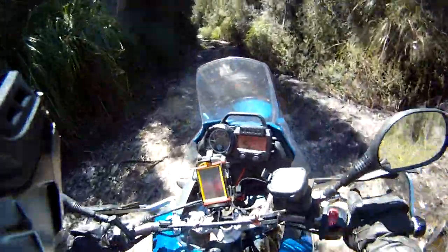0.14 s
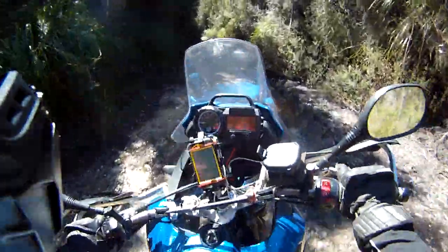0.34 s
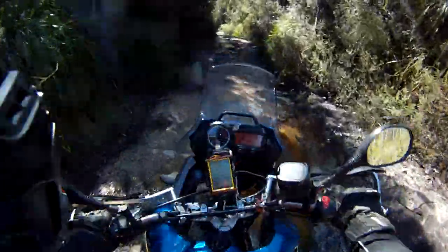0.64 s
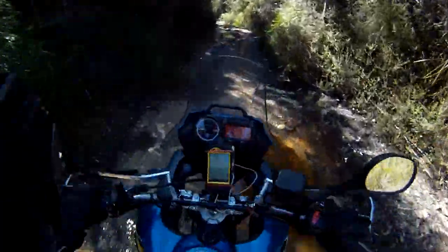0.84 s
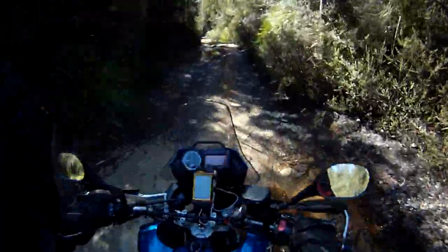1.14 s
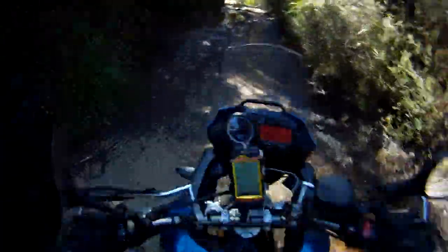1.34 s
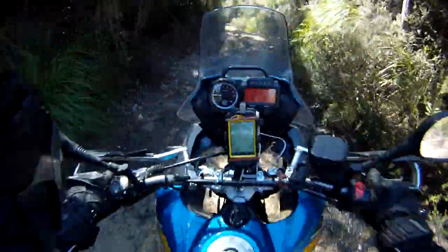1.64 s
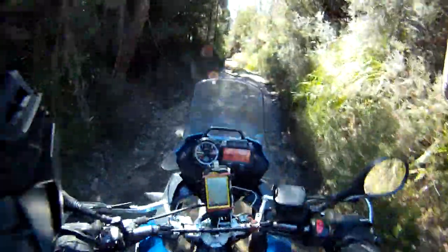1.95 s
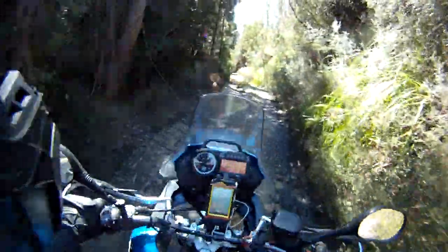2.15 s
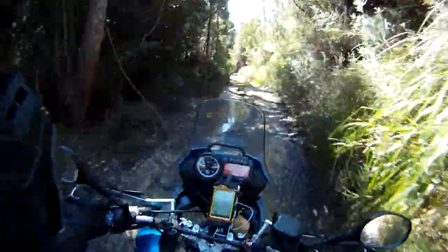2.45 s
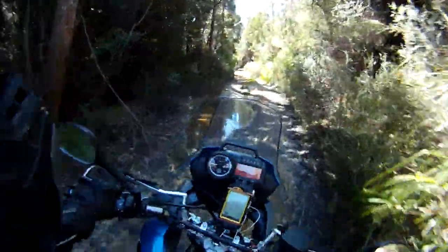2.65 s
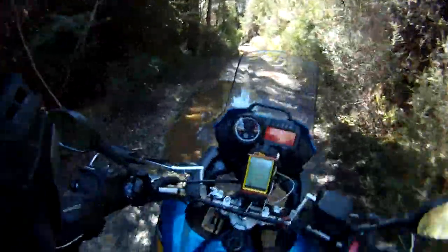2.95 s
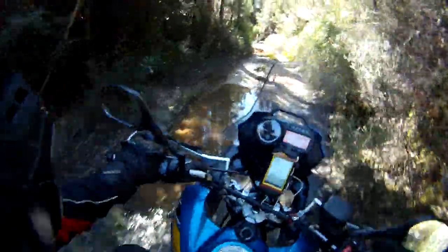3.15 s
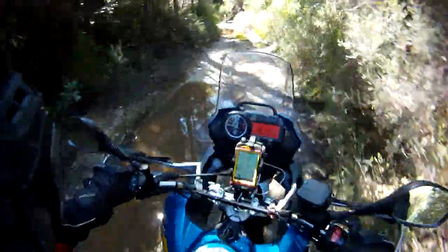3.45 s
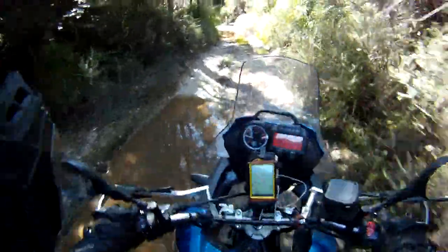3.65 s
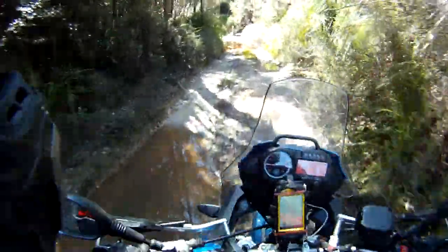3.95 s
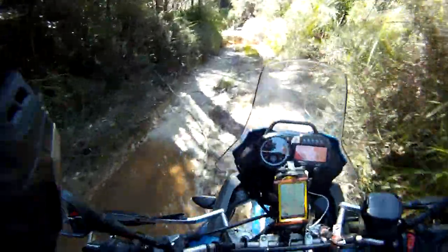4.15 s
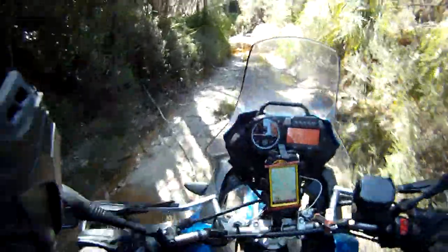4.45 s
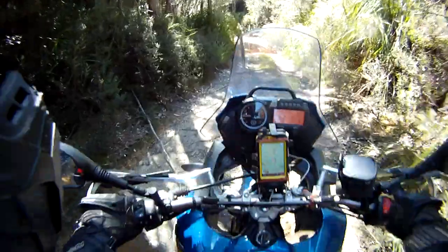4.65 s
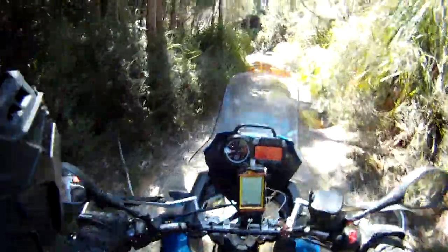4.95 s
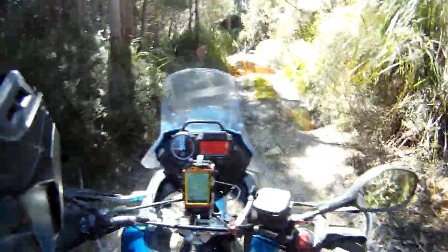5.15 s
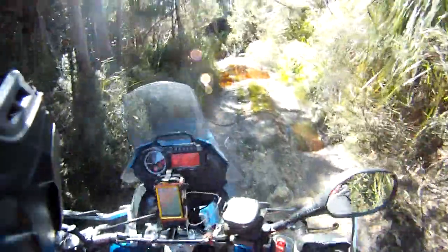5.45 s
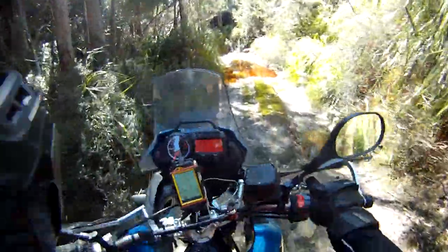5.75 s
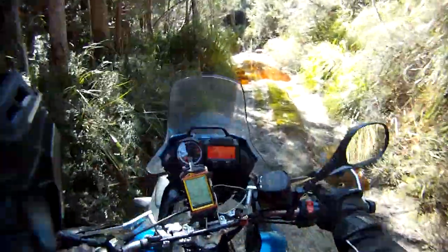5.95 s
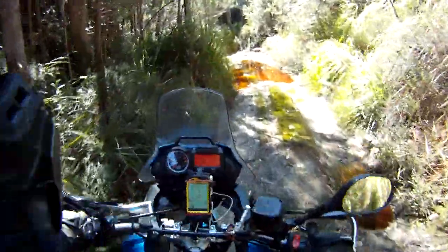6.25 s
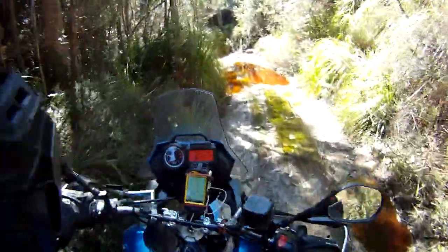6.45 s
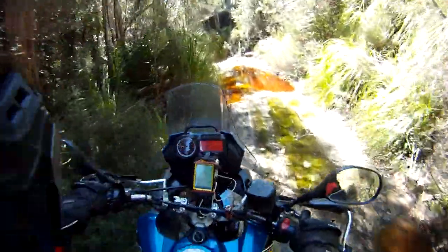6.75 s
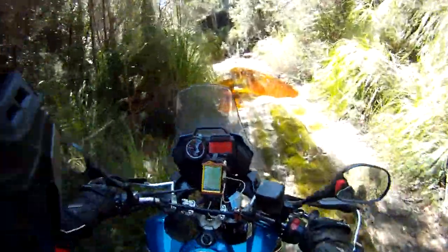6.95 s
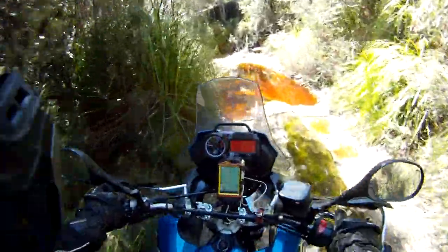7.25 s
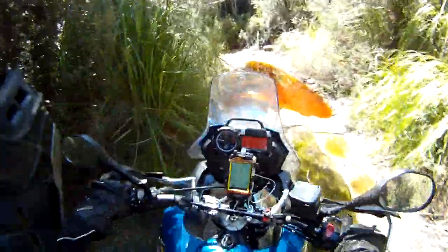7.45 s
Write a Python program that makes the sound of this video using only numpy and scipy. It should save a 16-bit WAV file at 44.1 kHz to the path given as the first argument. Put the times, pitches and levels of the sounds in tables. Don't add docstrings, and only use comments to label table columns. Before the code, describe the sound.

Outdoors on a rough trail, a slow thudding engine rattles continuously, each firing distinct. Gravel crunches in small clumps, with sharp stone clicks and hollow plastic knocks around two deep bumps. Revs swell briefly early on, settle into a steady plod, surge strongly near six seconds and sink to a slow chug. The enclosed microphone muffles the exhaust, emphasises nasal midrange clatter and adds gritty, coarse treble.

```python
import sys
import numpy as np
from scipy import signal
from scipy.fft import rfft, irfft
from scipy.io import wavfile
from scipy.ndimage import uniform_filter1d

SR = 44100
rng = np.random.default_rng(int(sys.argv[2]) if len(sys.argv) > 2 else 0)


def pcm_store(signal):
    levels = np.round(np.clip(np.atleast_2d(signal), -1, 1) * 32767)
    wavfile.write(sys.argv[1], SR, levels.astype(np.int16).T)


def voltage_ratio(level):
    return 10 ** (np.asarray(level, float) / 20)


N = 334719


# time in s, exhaust pop in dB, pipe pitch as a factor (hot gas raises it).
THROTTLE = [(0, -42.5, 1.05), (.3, -39.5, 1.11), (.6, -42, 1.105), (1, -44, 0.99), (1.3, -41.5, 0.97),
            (1.69, -46, 1.11), (1.88, -35.5, 1.09), (2.19, -42, 0.98), (2.4, -40.5, 1.01), (3.2, -40, 1.13),
            (3.37, -47, 1.01), (4.4, -42.5, 1.085), (5.1, -46.5, 1.01), (5.57, -47, .99), (5.95, -35, 1.2),
            (6.5, -41.5, 1.074), (6.95, -39.5, 1.124), (7.59, -45, 1.09)]
# frequency in Hz, level in dB, t60 in s.
BLOW = [(220, -4, 0.055)]
# frequency in Hz, level in dB, t60 in s.
PIPE = [(186.6, -2.5, .12), (208.8, -4, 0.12)]
# frequency in Hz, level in dB, t60 in s.
SILENCER = [(249, -6.5, 0.089), (275.3, -10.5, 0.15), (343, -11, 0.056)]


def exhaust(cycles):
    lead = round(.0049 * SR)
    throttle_db, pitch = column(THROTTLE, index=1), column(THROTTLE, index=2)
    pops = once_a_cycle(cycles, spread_db=.5) * voltage_ratio(throttle_db + 2.5)
    pipe_db = 1.1 - 48 * (pitch - 1.03)
    silencer_db = 2.7 - 0.6 * (throttle_db + 42)
    blow_db = 0.8 * np.minimum(throttle_db + 40, 0)
    out = np.zeros(N + lead)
    for at in np.flatnonzero(pops):
        parts = (BLOW, blow_db[at]), (PIPE, pipe_db[at]), (SILENCER, silencer_db[at])
        modes = [(hz * pitch[at], db + extra_db, t60)
                 for part, extra_db in parts for hz, db, t60 in part]
        add(out, at / SR, -pops[at] * ring(modes, rise=0.0021, size=4500))
    muffle = signal.butter(2, (125, 310), "bandpass", fs=SR, output="sos")
    return signal.sosfiltfilt(muffle, out)[lead:]


# share of the cycle, level in dB.
STROKES = [(0, -1), (.1, -1), (.2, 1.5), (.33, 0), (.45, -4), (.6, -6.5), (.69, -6.5), (.71, 2), (.85, 0),
           (1, -1)]
# frequency in Hz, width in Hz, level in dB.
CASE = [(842, 450, -10), (1157, 66, 2.5), (1505, 180, 0), (1786, 210, 7), (2066, 360, -1.5),
        (2381, 58, -2.5), (2726, 130, 2.5), (3430, 180, -17.5), (4820, 1100, -1)]
# frequency in Hz, level in dB per Hz.
GRIT = [(800, -11.5), (1600, 1.5), (2800, 4), (3700, -1), (4300, -15.5), (4900, 4.5), (5600, -6),
        (7000, -9)]


def clatter(cycles):
    share, stroke_db = np.transpose(STROKES)
    extra_speed = speed() - 15
    drive = evened(grains(7000, 1.0)) * voltage_ratio(np.interp(cycles % 1, share, stroke_db))
    modes = [(hz, db + 10 * np.log10(width), 2.24 / width) for hz, width, db in CASE]
    low = signal.oaconvolve(drive, ring(modes[:5], rise=0.00012))[:N]
    high = signal.oaconvolve(drive, ring(modes[5:], rise=0.00012))[:N]
    rattle = evened(low + voltage_ratio(0.34 * extra_speed) * high)
    hiss = voltage_ratio(-14) * coloured(drive, GRIT)
    load_db = 0.11 * (column(THROTTLE, index=1) + 41)
    revs_db = 0.3642 * extra_speed
    jolts_db = 0.68 * (np.maximum(column(TRAIL, index=1), -62) + 60)
    return voltage_ratio(-49.5 + load_db + revs_db + jolts_db) * (rattle + hiss)


def valve(cycles):
    lead_cycles = .285 + .008 * (speed() - 15)
    ticks = once_a_cycle(cycles + lead_cycles, spread_db=1) * ticking()
    bounce = voltage_ratio(-60 * np.arange(2500) / SR / 0.085)
    chatter = signal.oaconvolve(ticks, bounce)[:N] * grains(4000, .4)
    modes = [(1814, 0.5, 0.054), (1773, -6, 0.03), (1420, -3, 0.013),
             (1120, -11, 0.025), (2590, -5.5, 0.022), (2630, -20, 0.019)]
    return signal.oaconvolve(0.69 * ticks + 0.11 * chatter, ring(modes, rise=0.00052))[:N]


# start in s, length in s, level in dB.
TICKING = [(0, .66, -38), (.66, .4, -44.5), (1.8, .3, -49), (2.3, .46, -38.5), (2.98, .2, -43),
           (3.98, .14, -41), (4.33, .12, -39), (4.66, .12, -48), (5.35, .3, -59), (5.66, .14, -45),
           (6.0, .14, -42), (6.38, .28, -39), (6.66, .33, -45)]


def ticking():
    out = np.full(N, voltage_ratio(-59))
    for s, length_s, db in TICKING:
        add(out, s, np.full(round(length_s * SR), voltage_ratio(db)))
    return out


ORDER_DB = (2, -3, -2, 2.5, -3.5, -7)
IN_STEP_HZ = (32.5, 55, 54, 100, 89, 80)
LAG_PER_HZ = (.22, .18, .17, .03, .05, .05)
# frequency in Hz, level in dB.
FRAME = [(22, -24), (33, -9), (41, -5), (48, -3), (58, -14), (70, -11), (85, -9), (96, -18), (120, -25),
         (180, -22)]


def engine_orders(cycles):
    rate = speed()
    idling_db = 2.4 * np.minimum(rate - 16.5, 0)
    out = np.zeros(N)
    for k, (db, in_step_hz, lag) in enumerate(zip(ORDER_DB, IN_STEP_HZ, LAG_PER_HZ), 2):
        level_db = db + read(FRAME, k * rate) + idling_db * (k < 4)
        phase = 2 * np.pi * k * cycles - lag * (k * rate - in_step_hz)
        out += voltage_ratio(level_db) * np.cos(phase)
    return voltage_ratio(column(THROTTLE, index=1)) * out


# frequency in Hz, level in dB per Hz.
RUMBLE = [(60, -11), (115, 0.5), (150, 0.5), (200, 2), (290, -1), (360, -8.5), (480, -3.5), (650, -25),
          (1000, -27), (1500, -58)]


def rumble(cycles):
    throttle_db = column(THROTTLE, index=1)
    rush = 0.7 + 1.1 * np.exp(-((cycles + .1) % 1) / 0.35)
    level_db = throttle_db - 21.5 - 0.5 * (throttle_db + 45)
    return voltage_ratio(level_db) * rush * coloured(grains(3000, 2.0), RUMBLE)


# crest in s, level in dB, frequency in Hz, fading time in s.
BUMPS = [(0.128, -54, 47, 0.022), (0.285, -43, 52.4, 0.02), (0.405, -41, 47.7, 0.038),
         (0.608, -30.5, 41, 0.046), (1.214, -32, 31.6, 0.033), (1.306, -28, 38.2, 0.012),
         (1.373, -37, 48, 0.026), (1.489, -35, 35.5, 0.026), (1.588, -18.5, 32.4, 0.011),
         (1.659, -33.5, 43.7, 0.028), (1.729, -27.5, 35, 0.014), (1.878, -28.5, 37, 0.03),
         (2.312, -40, 40.7, 0.032), (2.543, -55, 50, 0.046), (2.656, -48, 53, 0.067),
         (3.078, -44, 40.5, 0.03), (3.192, -38, 34.5, 0.033), (3.259, -33.5, 41.8, 0.026),
         (3.415, -18.5, 39.7, 0.025), (3.488, -33.5, 41.4, 0.017), (3.58, -33, 34.2, 0.019),
         (3.767, -38.5, 41, 0.064), (4.461, -39, 39, 0.03), (4.798, -45, 39, 0.034),
         (5.043, -47, 34, 0.029), (5.271, -30.5, 41, 0.012), (5.332, -39, 37.5, 0.015),
         (7.55, -34, 42.8, 0.022)]


def mount():
    lumps = coloured(rng.standard_normal(N), [(6, -20), (16, -8), (28, -11.5), (41, 3), (55, -14.5),
                                              (85, -16.5), (125, -20), (170, -42.5)])
    heaps_db = 4.66 * coloured(rng.standard_normal(N), [(1, 4.0), (8, 11), (20, -44.5)])
    out = trembling() * lumps * voltage_ratio(heaps_db)
    t = np.arange(-SR // 10, SR // 4) / SR
    for s, db, hz, fade_s in BUMPS:
        rise = np.exp(-(np.minimum(t, 0) / 0.029) ** 2)
        fall = np.cosh(np.maximum(t, 0) / fade_s)
        add(out, s + t[0], voltage_ratio(db) * rise / fall * np.cos(2 * np.pi * hz * t))
    return out


def trembling():
    t = np.arange(N) / SR
    steady = voltage_ratio(-54 + 0.43 * (column(THROTTLE, index=1) + 47))
    around = sum(voltage_ratio(db - 22) ** 2 * np.exp(-((t - s) / 0.13) ** 2) for s, db, _, _ in BUMPS)
    return np.sqrt(steady ** 2 + around)


# time in s, level in dB, brightness in dB.
KNOCKS = [
    (1.147, -36.5, 6),
    (1.244, -42, -5),
    (1.712, -41.5, -3),
    (1.853, -44.5, -9),
    (2.807, -39, -3),
    (2.9647, -35, 9.5),
    (3.245, -46, 9.5),
    (3.512, -43.5, 10),
    (4.058, -43.5, 13),
    (4.353, -37.5, 5),
]
# frequency in Hz, level in dB, t60 in s.
KNOCK = [(805, 3, .075), (520, -8, .03), (680, -9, .03), (1030, -6, .025), (1160, -3, .04),
         (1464, -0.5, .02), (1670, -5, .01), (127, -2, .085)]


def knocks():
    out = np.zeros(N)
    buzz_hz_db = [(250, -12), (600, -2), (1500, 0), (2500, -12), (4000, -40)]
    for s, db, bright_db in KNOCKS:
        modes = [(hz, level + (bright_db if hz > 1200 else 0), t60) for hz, level, t60 in KNOCK]
        add(out, s, -voltage_ratio(db + 0.5) * ring(modes, rise=0.00047, size=6000))
        add(out, s, -voltage_ratio(db + 6) * ring([(1100, 0, .007)], rise=.0003))
        add(out, s + 0.00617, voltage_ratio(db - 10.5) * ring(modes, rise=0.0028))
        buzz = coloured(rng.standard_normal(3000), buzz_hz_db)
        add(out, s, voltage_ratio(db - 8 - 60 * np.arange(3000) / SR / 0.072) * buzz)
    return out


# time in s, level in dB, frequency in Hz.
STONES = [(0.483, -40, 3430), (0.9868, -36.5, 3470), (1.1029, -39, 4400), (1.1174, -43, 4800),
          (1.1244, -42, 4700), (1.1717, -28, 4710), (1.179, -42, 4580), (1.7953, -40, 3840),
          (1.8923, -37, 4800), (2.172, -36, 5040), (2.2567, -37, 3600), (2.895, -37.5, 4400),
          (3.149, -43, 4610), (3.3556, -35.5, 3680), (3.4017, -50, 4120), (3.411, -40.5, 4740),
          (3.4191, -34.5, 4740), (3.461, -43, 3600), (3.8244, -58, 4770), (3.87, -42, 4900),
          (3.8931, -39.5, 3580), (3.92, -51, 4900), (3.9539, -45, 3510), (4.095, -43, 3520),
          (4.2647, -51, 3630), (5.025, -42.5, 4520), (5.1796, -46, 4450), (5.3168, -42.5, 4500)]
# time in s, level in dB, frequency in Hz, t60 in s.
CRACKS = [(1.0465, -40, 1730, 0.22), (1.0934, -29, 2020, 0.024), (1.0974, -41, 2900, 0.03),
          (1.1094, -33.5, 1590, 0.045), (1.1717, -51, 1790, 0.024), (1.9091, -41, 1680, 0.065),
          (1.9754, -32, 1850, 0.019), (3.3548, -41, 1830, 0.033), (3.7833, -61, 1830, 0.025),
          (3.8252, -33.5, 1630, 0.03), (3.9913, -50, 1820, 0.02), (4.0078, -37, 1860, 0.019),
          (4.1859, -42, 2380, 0.03), (4.559, -41, 1480, 0.037), (4.7581, -49, 1420, 0.12),
          (5.9923, -44, 1720, 0.02), (6.1544, -42, 1480, 0.049)]


def stones():
    out = np.zeros(N)
    thrown = [(*stone, .013) for stone in STONES]
    for s, db, hz, t60 in thrown + CRACKS:
        modes = [(hz, 0, t60), (hz * 1.09, -4, t60 * 0.87), (hz * 0.92, -6, t60 * .5)]
        grit_db = -8 + .5 * hz / 1000 - 60 * np.arange(3000) / SR / t60
        grit = coloured(rng.standard_normal(3000), GRIT) * voltage_ratio(grit_db)
        add(out, s, voltage_ratio(db) * (ring(modes, rise=0.0003) + grit))
    return out


# time in s, level in dB.
TRAIL = [(0, -59), (.17, -61.5), (.51, -62), (.93, -70), (1.0, -55.5), (1.2, -56.5), (1.48, -51.5),
         (1.8, -55.5), (2.08, -52.5), (2.4, -60.5), (3.24, -60), (3.31, -66), (3.65, -63), (4.2, -62),
         (4.4, -64.5), (5.57, -68), (5.9, -58.5), (7.59, -71)]
# frequency in Hz, level in dB per Hz.
GRAVEL = [(400, -8.5), (900, -21.5), (1150, -0.5), (1500, -2), (2100, -1), (2750, -0.5), (3400, -7.5),
          (4300, -14.5), (4850, -11), (5600, -11.5), (7000, -54)]
# start in s, length in s, level in dB.
SCRAPES = [
    (3.698, .048, -43),
    (3.354, .02, -50),
    (3.89, .038, -48),
    (5.19, .03, -58),
    (4.09, .05, -55),
    (3.455, .015, -54),
    (3.945, .02, -54),
    (.98, .03, -58),
]


def tyres():
    smooth = uniform_filter1d(uniform_filter1d(rng.standard_normal(N), 500), 300)
    clumps = voltage_ratio(2.07 * evened(smooth))
    crunch = voltage_ratio(column(TRAIL, index=1) + 9.5) * clumps * coloured(grains(7000, 0.28), GRAVEL)
    scrape = np.zeros(N)
    for s, length_s, db in SCRAPES:
        add(scrape, s, voltage_ratio(db) * signal.windows.tukey(round(length_s * SR), .4))
    return crunch + scrape * coloured(grains(6000, 0.77), GRIT)


# time in s, firings per s.
SPEED = [(0.0, 12.432), (0.196, 14.593), (0.468, 15.243), (0.555, 12.474), (1.282, 13.357), (1.497, 23.657),
         (1.702, 14.046), (2.121, 13.991), (2.126, 13.548), (2.496, 17.141), (3.11, 17.579), (3.38, 13.011),
         (5.637, 13.357), (6.039, 25.667), (6.491, 17.88), (7.006, 15.207), (7.306, 12.736), (7.59, 10.993)]
# time in s, firings per s gained.
LURCHES = [(0.879, 1.45), (1.502, -2.29), (2.069, 2.05), (3.66, 0.59), (4.051, -0.95), (4.622, 4.4),
           (4.684, -4.59), (4.886, 1.04), (5.316, -1.77), (5.844, 1.77), (6.98, 0.86)]


def speed():
    t = np.arange(N) / SR
    lurches = sum(gain * np.exp(-((t - s) / .1126) ** 2) for s, gain in LURCHES)
    return column(SPEED, index=1) + lurches


def once_a_cycle(cycles, spread_db):
    whole = np.floor(cycles).astype(int)
    strength = voltage_ratio(spread_db * rng.standard_normal(400))
    return np.diff(whole, prepend=whole[0]) * strength[whole]


def grains(per_s, spread_db):
    size = voltage_ratio(spread_db * np.minimum(rng.exponential(1, N), 5)) * rng.standard_normal(N)
    return size * (rng.random(N) < per_s / SR)


def ring(modes, rise, size=3000):
    t = np.arange(size) / SR
    tones = sum(voltage_ratio(db - 60 * t / t60) * np.sin(2 * np.pi * hz * t) for hz, db, t60 in modes)
    return tones * (1 - np.exp(-t / rise))


def coloured(x, points):
    gain = voltage_ratio(read(points, np.fft.rfftfreq(len(x), 1 / SR)))
    return evened(irfft(rfft(x) * gain, len(x)))


def read(points, hz):
    known_hz, db = np.transpose(points)
    return np.interp(np.log(hz + 1), np.log(known_hz + 1), db)


def evened(x):
    return x / np.sqrt(np.mean(x ** 2) + 1e-20)


def column(table, index):
    rows = np.array(table)
    return np.interp(np.arange(N) / SR, rows[:, 0], rows[:, index])


def add(mix, s, sound):
    part = mix[round(s * SR):][:len(sound)]
    part += sound[:len(part)]


def scene():
    cycles = .8536 + np.cumsum(speed()) / SR
    engine = exhaust(cycles) + clatter(cycles) + valve(cycles)
    shaking = engine_orders(cycles) + rumble(cycles) + mount()
    return (engine + shaking + knocks() + stones() + tyres())[None]


def top_cut(x):
    return signal.sosfilt(signal.butter(12, 15680, fs=SR, output="sos"), x)


def record(dry):
    edge = signal.butter(6, 5500, fs=SR, output="sos")
    slow = signal.resample_poly(signal.sosfilt(edge, dry), 40, 147, axis=1)
    held = np.repeat(slow, 4, axis=1)
    converted = signal.resample_poly(held, 147, 160, axis=1)[:, :N]
    top = signal.firwin(401, 15330, window=("kaiser", 8), fs=SR)
    mix = signal.oaconvolve(converted, top[None], "same")
    return top_cut(mix)


dry = scene()
out = record(dry)
pcm_store(out)
```